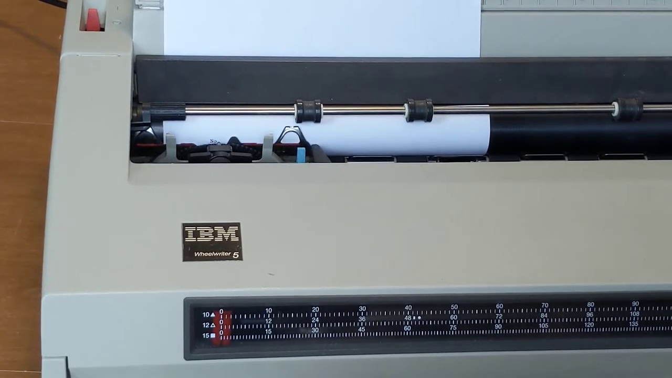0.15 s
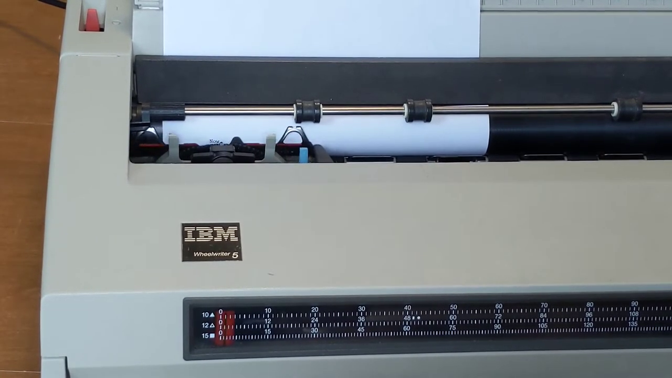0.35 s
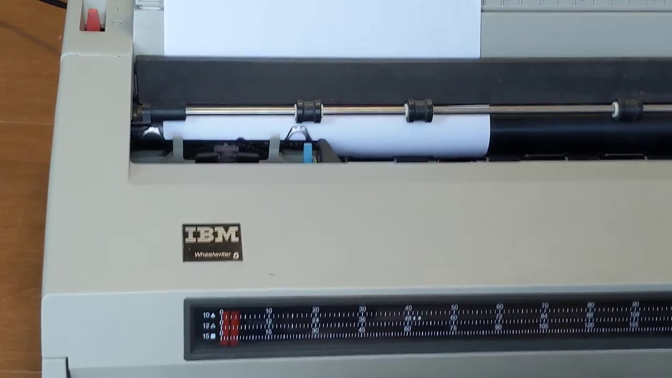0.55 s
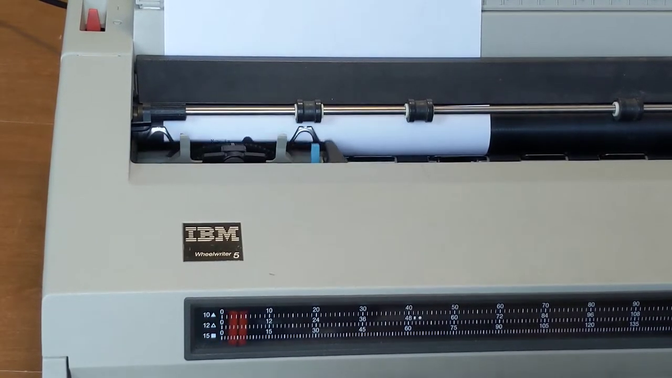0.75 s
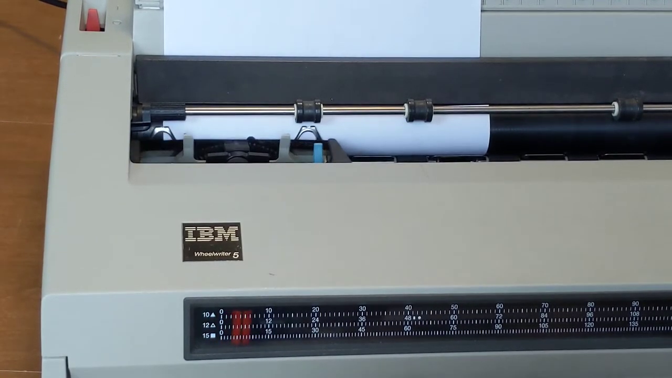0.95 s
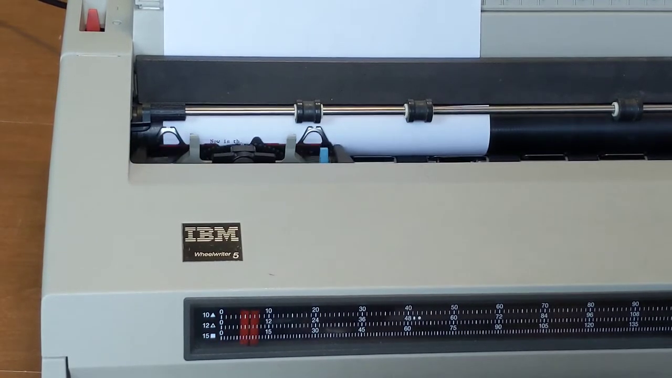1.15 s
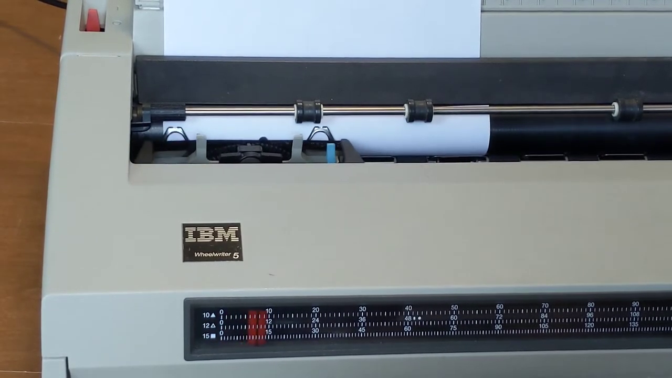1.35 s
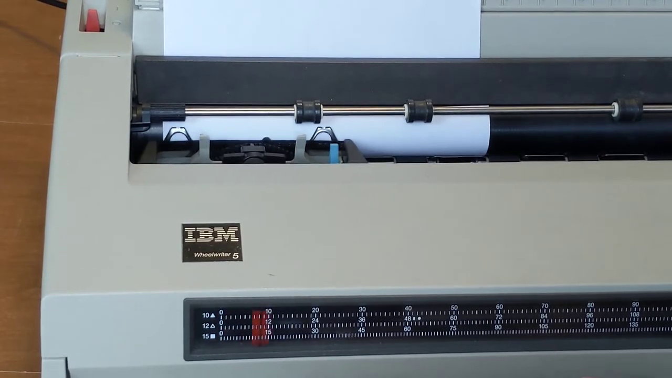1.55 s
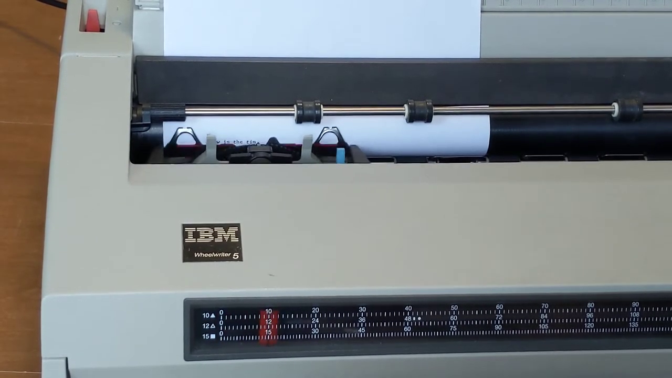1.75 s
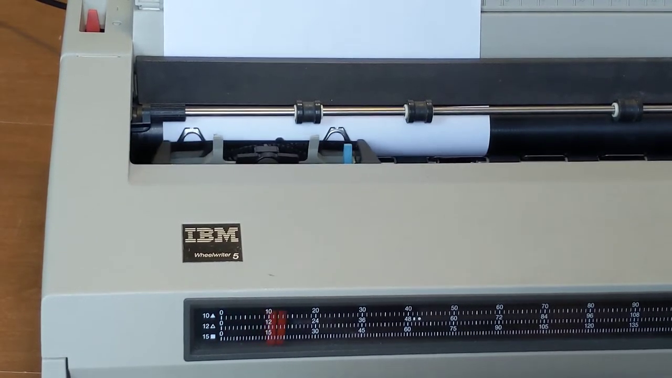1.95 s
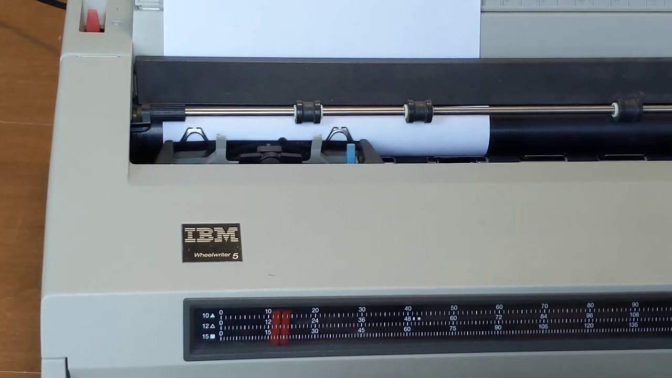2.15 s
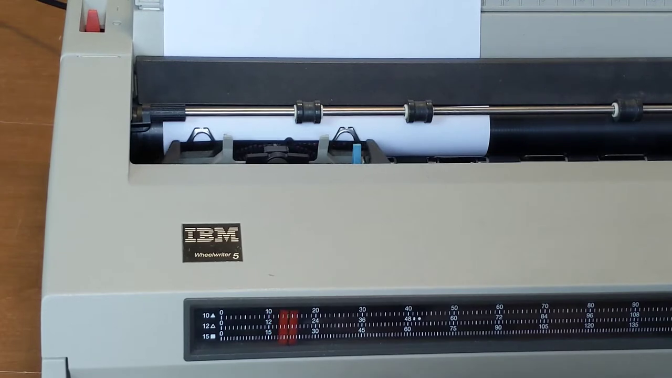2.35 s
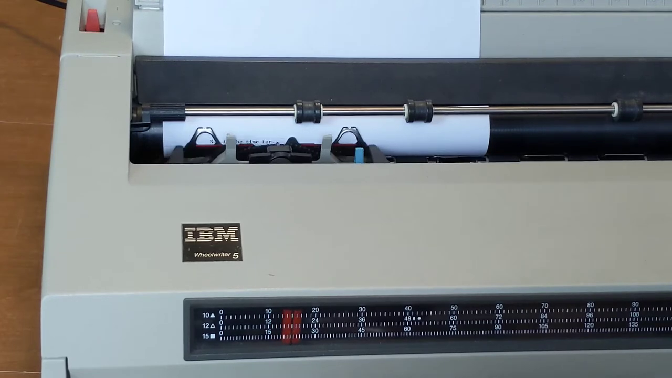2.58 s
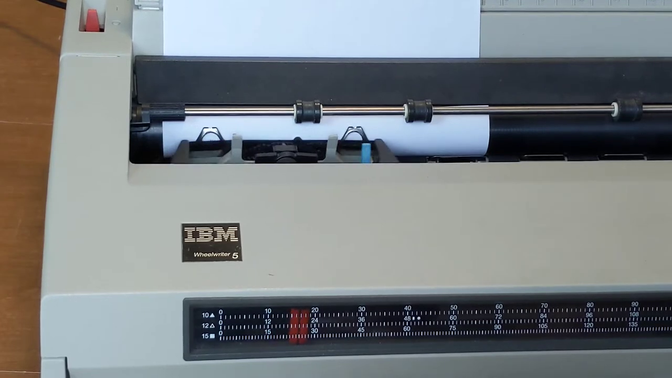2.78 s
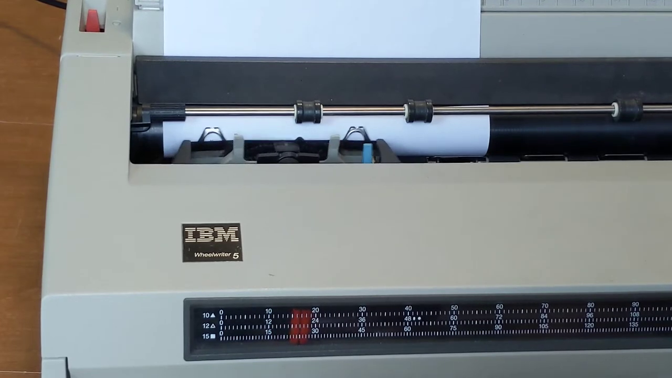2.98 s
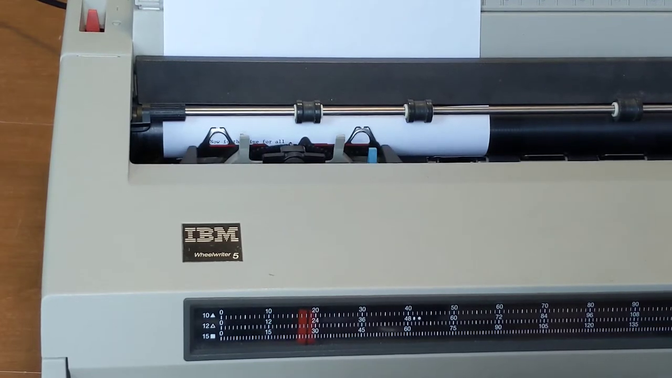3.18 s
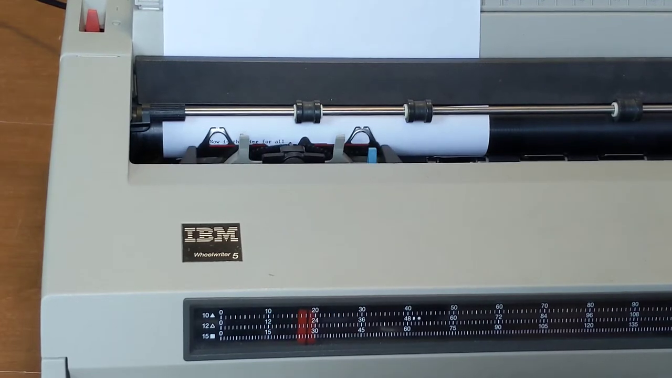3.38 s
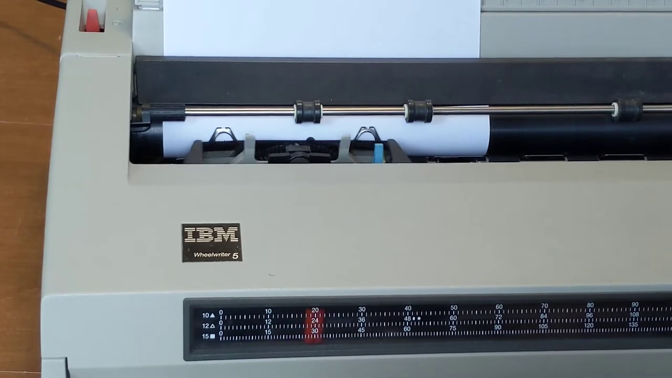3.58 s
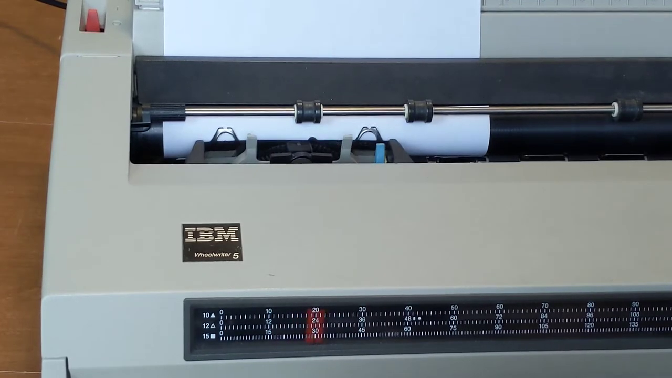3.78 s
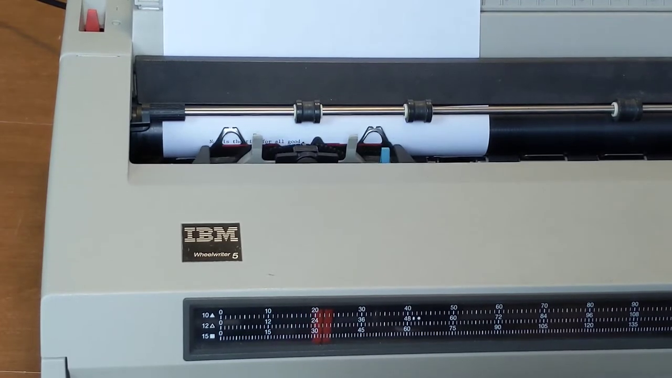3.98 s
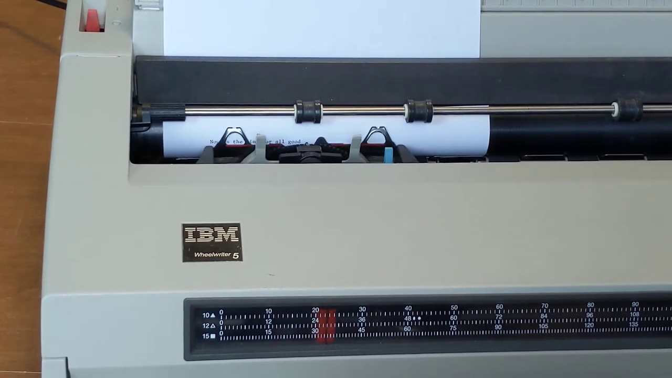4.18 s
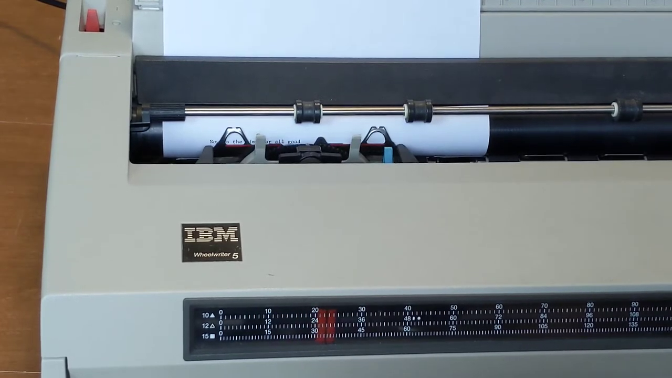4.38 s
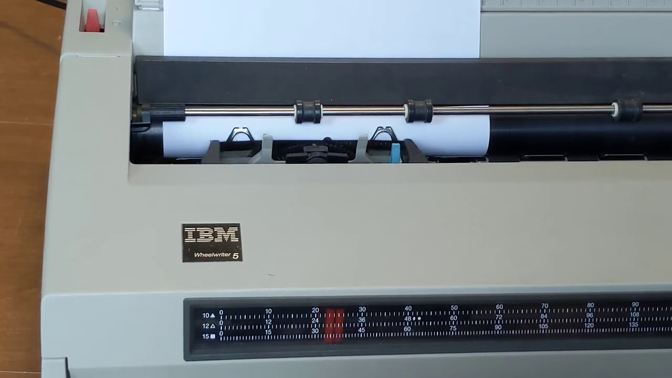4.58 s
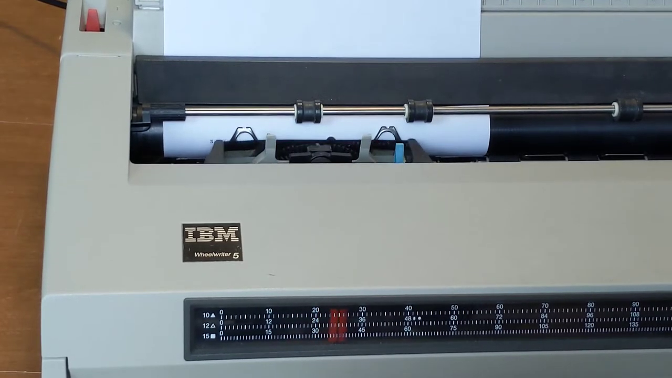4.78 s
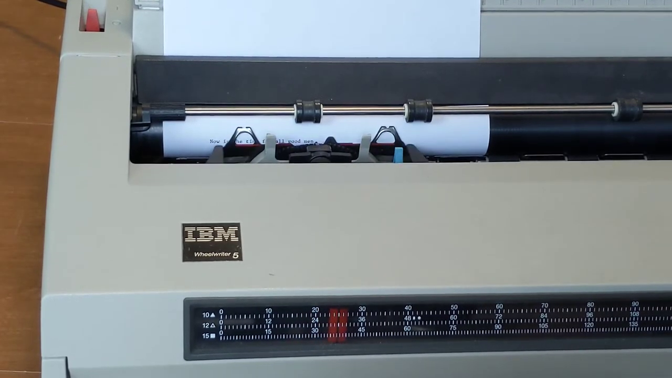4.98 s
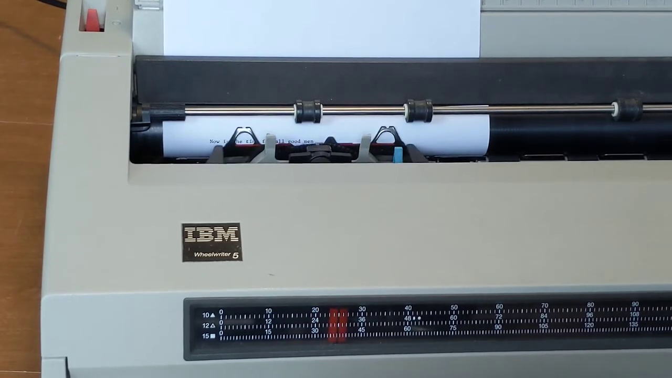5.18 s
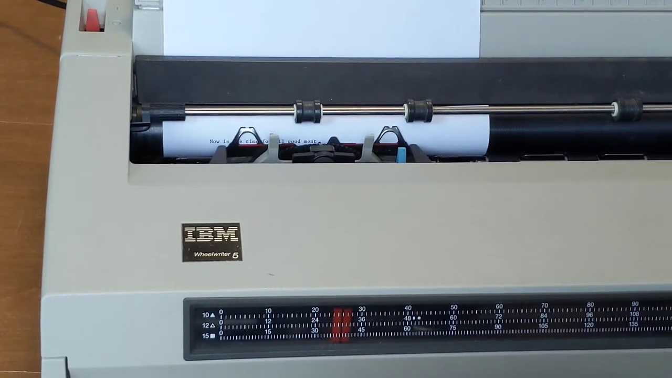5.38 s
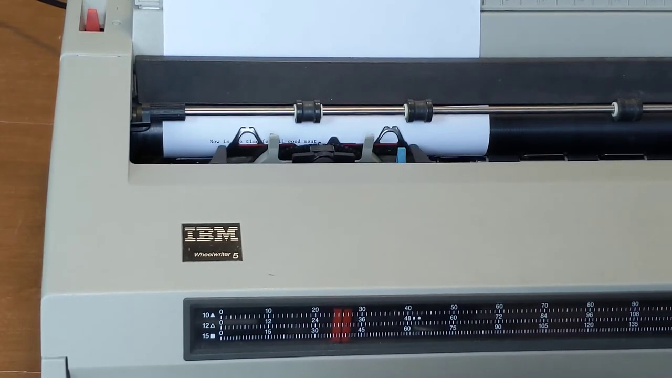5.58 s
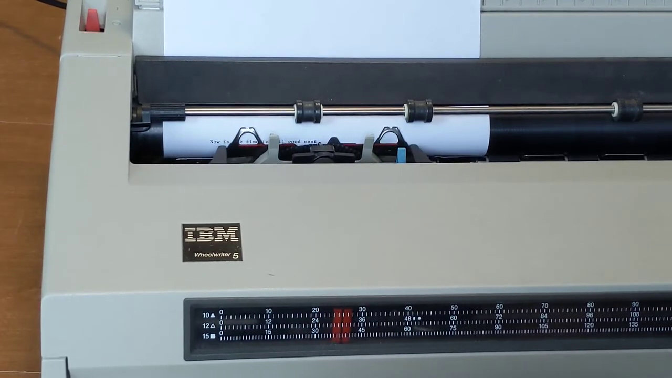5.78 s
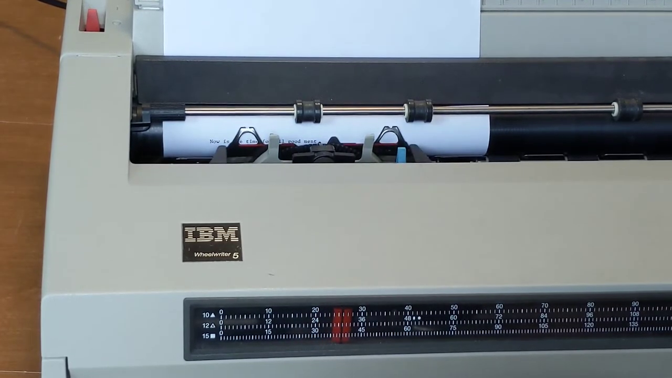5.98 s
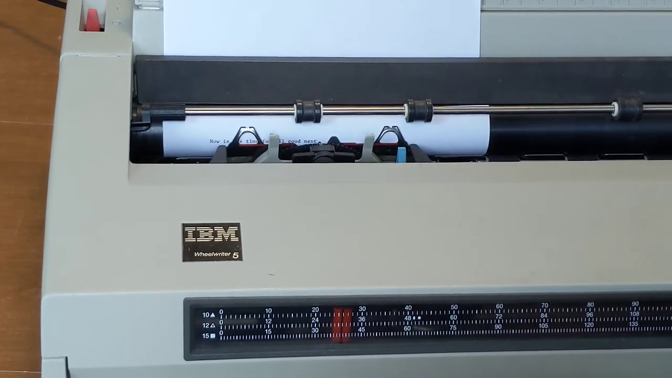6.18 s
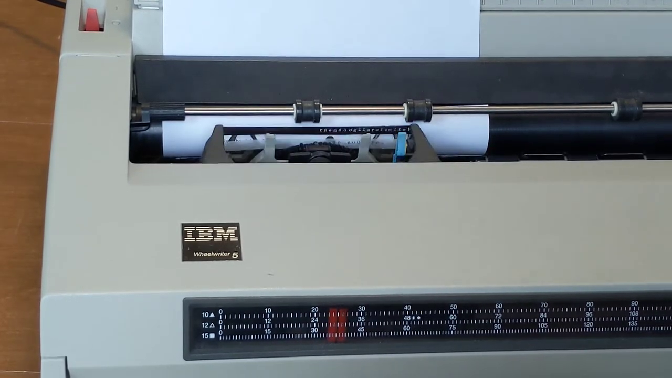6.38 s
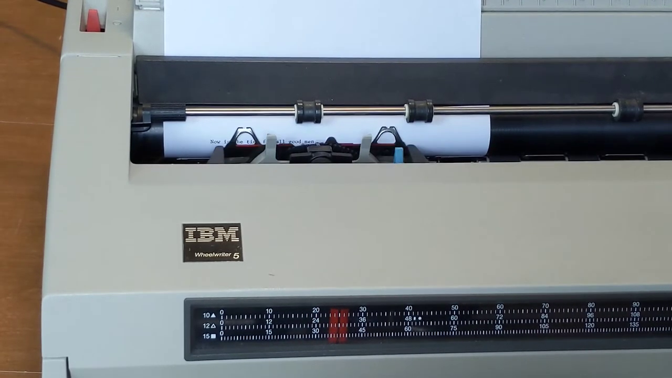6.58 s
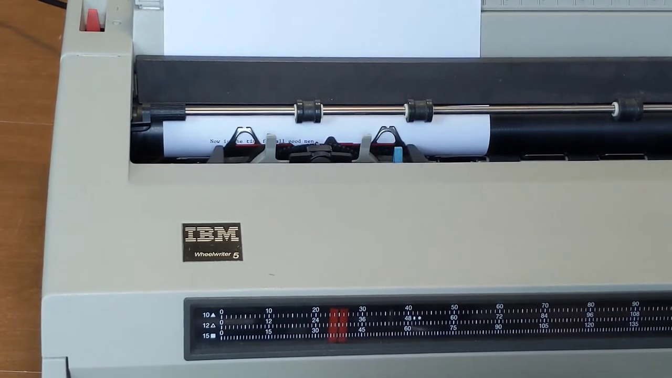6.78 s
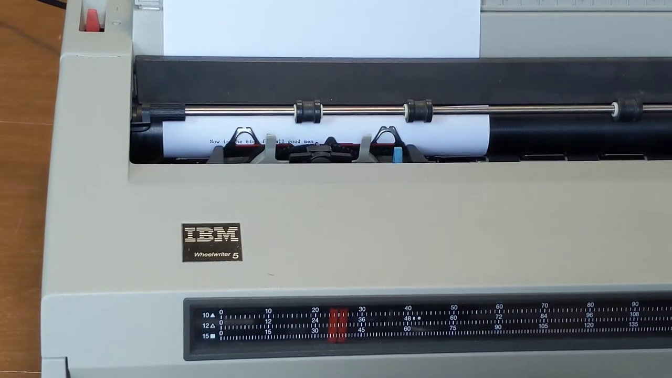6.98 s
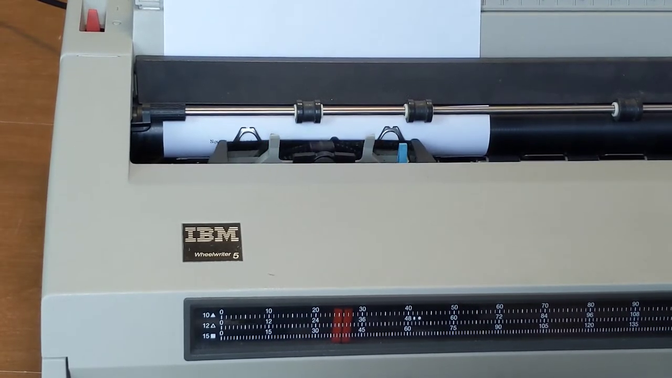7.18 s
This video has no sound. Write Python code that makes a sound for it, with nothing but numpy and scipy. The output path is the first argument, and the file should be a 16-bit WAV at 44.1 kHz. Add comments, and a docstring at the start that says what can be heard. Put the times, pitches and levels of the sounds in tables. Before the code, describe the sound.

An electronic typewriter is heard from just above its cover, on a desk in a quiet room with faint hiss and hum. It opens with a short motor whirr and key knocks, and the first letter strikes at about 0.3 seconds. Until about 5.4 seconds the typing runs unevenly, with sharp slaps coming singly or in quick twos and threes, each trailing a bright rattle and slight metallic ring. Dry plastic key knocks and brittle ribbon clicks fall between them, while the print wheel and carrier whirr in short bursts and the desk thuds softly. A lull follows, with a few light key taps around 6 seconds. At 6.3 seconds the motors whirr again, and two fast strikes land near 6.5 seconds. The carrier shifts with a thud just afterwards, and a few last key knocks and brief whirrs come at around 7.1 seconds.

```python
"""Daisy-wheel typewriter on a desk

Heard from just above the cover in a quiet room. Stepper motors whirr the wheel and carrier
into place, and the desk thuds along. Fingers knock the keys, exciting their damped modes.
A hammer slaps each letter onto the platen; the impact sets the frame chattering
and the metal of the carrier ringing."""
import sys
import numpy as np
from scipy import signal
from scipy.fft import rfft, irfft
from scipy.io import wavfile
from scipy.ndimage import uniform_filter1d

SR = 44100
rng = np.random.default_rng(int(sys.argv[2]) if len(sys.argv) > 2 else 0)


def generate_wav(sig):
    """Save sig (samples, or channels by samples) to the path in sys.argv[1] as 16-bit PCM at SR."""
    pcm = np.round(np.clip(np.atleast_2d(sig).T, -1, 1) * 32767).astype(np.int16)
    wavfile.write(sys.argv[1], SR, pcm)


N = 319284


def amp(db):
    return 10 ** (np.asarray(db) / 20)


def unit_rms(x):
    return x / np.sqrt(np.mean(x ** 2) + 1e-20)


def curve_at(points, hz):
    """Interpolation on a logarithmic frequency axis."""
    f, value = np.transpose(points)
    return np.interp(np.log(hz + 1), np.log(f + 1), value)


def add(mix, onset, sound):
    """Superposition of a sound on the mix at its onset in seconds."""
    part = mix[:, round(onset * SR):][:, :sound.shape[1]]
    part += sound[:, :part.shape[1]]


def excite(response, force):
    """A linear system convolves its input with its impulse response."""
    return signal.oaconvolve(force, response)[:, :N]


def butterworth(x, order, hz, kind):
    return signal.sosfilt(signal.butter(order, hz, kind, fs=SR, output="sos"), x)


def colour(spectrum):
    """Minimum-phase impulse response of unit energy with the given spectral shape."""
    hz = abs(np.fft.fftfreq(2 ** 12, 1 / SR))
    log_gain = np.log(amp(np.maximum(curve_at(spectrum, hz), -100)))
    phase = -signal.hilbert(log_gain).imag
    taps = np.fft.ifft(np.exp(log_gain + 1j * phase)).real[:2048]
    return taps[None] / np.linalg.norm(taps)


def ring(modes, seconds):
    """Free vibration: a sum of damped modes (f/Hz, level/dB, T60/s)."""
    t = np.arange(round(seconds * SR)) / SR
    return sum(amp(db - 60 * t / t60) * np.sin(2 * np.pi * hz * t) for hz, db, t60 in modes)[None]


def chatter(seconds, t60, rise, spread_db):
    """Loose parts rattle after a shock: two draws of uneven noise in exponential decay."""
    t = np.arange(round(seconds * SR)) / SR
    noise = rng.standard_normal((2, len(t)))
    flicker = unit_rms(uniform_filter1d(rng.standard_normal(len(t)), 40))
    clicks = unit_rms(noise * amp(spread_db * flicker))
    return clicks * (1 - np.exp(-t / rise)) * amp(-60 * t / t60)


# Spectral shapes of the steady noise: f/Hz, level/dB
RUMBLE_SPECTRUM = [(15, -15.5), (40, 0.5), (90, -7.5), (200, -15), (260, -10.5), (500, -12), (900, -16.5),
                   (1500, -24)]
HISS_SPECTRUM = [(650, -40.5), (1100, -7.5), (1570, -16.5), (2550, -14.5), (3150, -5), (3410, 0.5),
                 (3530, -4), (4360, 0), (4880, -12), (5580, 1), (6680, -12), (7600, -5.5), (8740, -15.5),
                 (9770, -4), (12100, -18.5), (16000, -35.5)]
# Partials of the power supply: f/Hz, level/dB
HUM_PARTIALS = [(120, -66.5), (240, -69.5), (300, -76), (360, -85), (840, -72.5), (3305, -73)]


def background():
    """Stationary rumble and hiss, with a supply hum under slow amplitude modulation."""
    hz, t = np.fft.rfftfreq(N, 1 / SR), np.arange(N) / SR
    rumble, hiss = (unit_rms(irfft(rfft(rng.standard_normal((2, N))) * amp(curve_at(shape, hz)), N))
                    for shape in (RUMBLE_SPECTRUM, HISS_SPECTRUM))
    noise = rng.standard_normal((len(HUM_PARTIALS), N))
    wavers = unit_rms(uniform_filter1d(uniform_filter1d(noise, 3000), 3000))
    hum = sum(amp(db + 3.03 * waver) * np.sqrt(2) * np.sin(2 * np.pi * (f * t + rng.random()))
              for (f, db), waver in zip(HUM_PARTIALS, wavers))
    return amp(-58) * rumble + amp(-58.5) * hiss + hum


def run_envelope(runs, rise, t60):
    """Linear rise, hold and exponential decay; the loudest run (t/s, duration/s, level/dB) prevails."""
    t = np.arange(0, N, 32) / SR
    onset, length, db = np.transpose(runs)[..., None]
    attack = np.clip((t - onset) / rise, 0, 1)
    gains = attack * amp(db - 60 * np.maximum(t - onset - length, 0) / t60)
    return np.interp(np.arange(N) / SR, t, gains.max(0))


# The wheel spins to a letter, stopping at the next blow: t/s, whirr level/dB
WHEEL_SPINS = [(0.24, -45.5), (0.585, -43), (0.97, -41.5), (1.2, -40), (1.47, -42), (1.82, -40.5),
               (2.085, -40.5), (2.69, -45.5), (2.96, -40), (3.5, -44), (3.76, -44), (4.46, -43.5),
               (4.72, -45), (5.275, -43), (6.4, -37)]
# The carrier moves without printing: t/s, duration/s, whirr level/dB, drive level/dB, thud level/dB
CARRIER_MOVES = [(0.0, 0.0422, -37.5, 0.5, -9), (0.465, 0.0626, -48, 4.5, -3.5),
                 (0.848, 0.104, -42, 5.5, -8), (1.4, .06, -44, -3, -3.5), (2.558, 0.0727, -47.5, 3.5, -8.5),
                 (3.175, 0.1166, -43, 2.5, -9.5), (4.205, 0.077, -51.5, 3, -3.5),
                 (4.344, 0.057, -56.5, -5, -17), (6.317, 0.166, -44, 4.5, -3),
                 (6.6, 0.107, -40.5, -5, -0.5), (7.078, 0.0543, -53.5, 5, -1.5),
                 (7.182, 0.057, -48, -2.5, -12.5)]
# Spectral shapes of the motor whirr and the carrier groan: f/Hz, level/dB
WHIRR_SPECTRUM = [(88, -35), (150, -26.5), (649, -8.5), (1040, -4), (1170, -14.5), (1530, -8),
                  (1900, -14.5), (4000, -7), (4860, -15.5), (5910, -3.5), (6700, -18.5), (7600, -7.5),
                  (8500, -22), (9500, -8), (10700, -21), (11900, -14.5), (12700, -21.5), (14800, -26),
                  (16000, -10.5)]
GROAN_SPECTRUM = [(100, -17), (200, -6.5), (290, 1.5), (380, -4.5), (500, 3), (650, 1.5), (1200, -20.5)]
# Desk resonances: thud (f/Hz, T60/s), then shake (f/Hz, half-bandwidth/Hz)
DESK_MODES = [(112.88, 0.106), (44.8, 22)]
STEP_WAIT_S, STEP_S, STEP_WHIRR_DB = 0.0195, 0.1047, -40  # carrier and ribbon advance after each blow


def motors():
    """Forced vibration: the rasp of gears and ribbon drives a whirr, a groan and the shaking desk."""
    blows = np.transpose(HAMMER_BLOWS)[0]
    spins = [(t, blows[blows > t][0] - t, db) for t, db in WHEEL_SPINS]
    steps = [(t + STEP_WAIT_S, STEP_S, STEP_WHIRR_DB) for t in blows]
    whirr_runs = spins + steps + [move[:3] for move in CARRIER_MOVES]
    drive_runs = [(t, length, 0) for t, length, _ in steps]
    drive_runs += [(t, length, db) for t, length, _, db, _ in CARRIER_MOVES]
    shake_runs = [(t, length, min(db, 0)) for t, length, db in drive_runs]
    shake_runs += [(t, length, -4) for t, length, _ in spins]
    whirr = run_envelope(whirr_runs, rise=0.002, t60=0.333)
    groan = amp(-50.5) * run_envelope(drive_runs, rise=0.0071, t60=0.374)
    shake = amp(-50) * run_envelope(shake_runs, rise=0.0333, t60=0.52)
    rasp = rng.standard_normal((2, N))
    rasp *= amp(1.69 * unit_rms(uniform_filter1d(rng.standard_normal(N), 150)))  # roughness
    (thud_hz, thud_t60), (shake_hz, half_width) = DESK_MODES
    desk = ring([(shake_hz, 0, 1.11 / half_width), (thud_hz, -8, thud_t60)], 0.3)
    layers = [(whirr, colour(WHIRR_SPECTRUM)), (groan, colour(GROAN_SPECTRUM)), (shake, desk)]
    return sum(envelope * unit_rms(excite(body, rasp)) for envelope, body in layers)


THUD_DB, THUD_PEAK_S = -41, 0.0355
THUD_FADE_DB_PER_S = -0.94  # thuds weaken as the carrier travels along the line


def desk_thuds():
    """Transient response: each jerk of the carrier makes one desk mode swell and fade."""
    t = np.arange(round(0.25 * SR)) / SR
    swell = (t / THUD_PEAK_S * np.exp(1 - t / THUD_PEAK_S)) ** 4.3
    thud = swell * np.sin(2 * np.pi * DESK_MODES[0][0] * t)
    jerks = [(onset, 0) for onset, _ in HAMMER_BLOWS] + [(onset, db) for onset, *_, db in CARRIER_MOVES]
    out = np.zeros((2, N))
    for onset, db in jerks:  # row 0 only: the part common to both sides
        add(out[:1], onset, amp(THUD_DB + db + THUD_FADE_DB_PER_S * onset) * thud[None])
    return out


# Knocks of keys and latches: t/s, level/dB, f/Hz, relative click level/dB
KEY_KNOCKS = [(0.004, -42, 875, 0), (0.237, -33, 1083, -0.5), (0.295, -30.5, 1098, -3),
              (0.461, -24, 801, -6.5), (0.577, -28.5, 920, -7.5), (0.6, -24.5, 1296, -6),
              (0.686, -32.5, 1334, -0.5), (0.846, -18.5, 1009, -9.5), (0.945, -22.5, 908, -17.5),
              (0.959, -18, 1441, -17.5), (1.031, -28.5, 1300, -14.5), (1.058, -22, 1036, -11.5),
              (1.171, -30, 1330, -2), (1.271, -30, 1056, -1), (1.371, -23, 794, -10.5),
              (1.465, -20, 1310, -12.5), (1.529, -26, 1346, -5), (1.802, -20.5, 1077, -10),
              (1.983, -26.5, 776, -12.5), (2.113, -28.5, 1308, -4), (2.204, -35, 840, -6),
              (2.334, -32, 1064, -1), (2.553, -26.5, 764, -5), (2.679, -35, 1200, -6),
              (2.686, -26.5, 1334, -9), (2.8, -25, 1455, -15.5), (2.955, -27.5, 1128, -5.5),
              (3.169, -28.5, 760, -5.5), (3.23, -26.5, 1024, -19.5), (3.447, -38.5, 1035, -10.5),
              (3.496, -31.5, 1118, -4), (3.772, -28, 1305, -6), (3.837, -31, 770, -5.5),
              (4.202, -26, 794.5, -6.5), (4.351, -30.5, 826, -8), (4.459, -41, 1064, 0),
              (4.687, -24, 1069, -8), (4.759, -29, 1038, -5), (5.873, -35, 1610, -7),
              (6.006, -38.5, 1244, -17), (6.078, -41, 1342, -16.5), (6.293, -34.5, 1365, 3),
              (6.406, -30, 1495, -19), (6.663, -39, 1090, 0), (6.945, -54, 1090, -3.5),
              (7.046, -48, 1200, -4), (7.075, -27, 1583, -4), (7.196, -28.5, 1112, -8)]
# Modes of a key: ratio to the knock's frequency, level/dB, T60/s
KEY_MODES = [(1.0027, 4, 0.016), (1.221, 0.5, 0.0102), (0.779, -10, 0.0315), (1.6, -11, 0.0188),
             (2.488, -8.5, 0.0094)]
# Spectral shape of a click: f/Hz, level/dB
CLICK_SPECTRUM = [(180, -31.5), (300, -18.5), (915, -2.5), (1340, 1.5), (1870, -4), (3400, 1.5),
                  (4910, -10.5), (5610, -5.5), (9550, -6), (16000, -15)]
LIFT_LEAD_S, LIFT_DB = 0.034, -36.5  # the ribbon clicks up before each blow


def keys_and_ribbon():
    """Impact on heavily damped plastic gives a dry knock; keys and ribbon add brittle clicks."""
    knocks, clicks = np.zeros((2, 2, N))
    for t, db, hz, click_db in KEY_KNOCKS:
        shock = chatter(0.1, t60=0.0148, rise=0.000362, spread_db=4)
        shock += amp(-13.5) * chatter(0.1, t60=0.0796, rise=0.0023, spread_db=2.5)
        modes = [(hz * ratio, level, t60) for ratio, level, t60 in KEY_MODES]
        body = signal.fftconvolve(shock, ring(modes, 0.06), axes=1)
        add(knocks, t, amp(db + 1) * body / abs(body).max(1, keepdims=True))
        add(clicks, t, amp(db + click_db) * chatter(0.064, t60=0.256, rise=0.0008, spread_db=3))
    for t, _ in HAMMER_BLOWS:
        add(clicks, t - LIFT_LEAD_S, amp(LIFT_DB) * chatter(0.21, t60=0.2, rise=0.00065, spread_db=2.5))
    return butterworth(knocks, 2, 600, "high") + amp(-2.5) * excite(colour(CLICK_SPECTRUM), clicks)


# Blows of the hammer on the platen: t/s, level/dB
HAMMER_BLOWS = [(0.3442, -22), (0.694, -23.5), (0.7764, -22.5), (1.052, -24), (1.1283, -20.5),
                (1.339, -23.5), (1.6141, -23), (1.6764, -23), (1.7376, -21), (1.9524, -23.5),
                (2.2284, -22.5), (2.3038, -23), (2.393, -23.5), (2.778, -23), (2.8685, -22.5),
                (3.0821, -23), (3.586, -20), (3.6707, -23), (3.8837, -23), (3.9623, -20), (4.5651, -21),
                (4.6284, -23.5), (4.841, -23.5), (5.3652, -23.5), (6.4613, -23), (6.511, -24)]
# Spectral shape of the rattle after each blow, as heard at the microphones,
# whose housing resonances give the treble peaks: f/Hz, level/dB
RATTLE_SPECTRUM = [(88, -22.5), (150, -21), (578, -12.5), (1530, -12.5), (1980, -14), (3700, -6),
                   (4080, -0.5), (4950, -10.5), (5790, -1.5), (6770, -12.5), (7600, -7.5), (8500, -11),
                   (9450, -6.5), (10600, -18), (11400, -14), (11900, -9), (12500, -21.5), (13800, -16.5),
                   (16000, -39.5)]
# Modes of the carrier's metal: f/Hz
CARRIER_MODE_HZ = [1039, 1600, 2382, 2461, 3505, 3851, 4042, 4117, 4168, 4235, 4300, 5722, 5838, 5963, 6302]
# Strength and decay of those modes: level/dB, T60/s
CARRIER_MODE_DECAYS = [(-12.5, 0.172), (-5, 0.07), (-0.5, 0.098), (1, 0.0463), (-0.5, 0.0333), (-28, 0.082),
                       (-28.5, 0.14), (-8, 0.21), (5, 0.138), (-1.5, 0.0433), (-24.5, 0.094), (-17, 0.063),
                       (-4, 0.074), (4.5, 0.13), (-4.5, 0.12)]
CROSSOVER_HZ = 7420  # the finer rattle above this builds up a moment later


def hammer():
    """Impact excitation: each blow slaps the platen, rattles the frame and rings the carrier's modes."""
    crack, rattle, fine, impulse = np.zeros((4, 2, N))
    for t, db in HAMMER_BLOWS:
        # the type lands and bounces
        add(crack, t, amp(db) * chatter(0.013, t60=0.0344, rise=0.000057, spread_db=1.5))
        add(rattle, t, amp(db) * chatter(0.35, t60=0.2386, rise=0.00386, spread_db=1.5))
        add(impulse, t, amp(db + 13.5) * np.ones((2, 1)))
        add(fine, t, amp(db + 2.5) * chatter(0.55, t60=0.1542, rise=0.00675, spread_db=-0.5))
    slap = amp(-14.5) * butterworth(crack, 3, [900, 6500], "band")
    full_rattle = butterworth(rattle, 4, CROSSOVER_HZ, "low") + butterworth(fine, 4, CROSSOVER_HZ, "high")
    heard_rattle = excite(colour(RATTLE_SPECTRUM), full_rattle)
    modes = [(hz, db, t60) for hz, (db, t60) in zip(CARRIER_MODE_HZ, CARRIER_MODE_DECAYS)]
    carrier_force = impulse + amp(-4.5) * crack + amp(-21.5) * rattle
    return slap + heard_rattle + amp(-27.5) * excite(ring(modes, 0.4), carrier_force)


def room(x, low_t60=0.5, high_t60=0.1596):
    """Diffuse reverberation: the treble decays faster, so the tail dulls as it dies."""
    t = np.arange(SR // 2) / SR
    noise = rng.standard_normal((2, len(t)))
    low = signal.lfilter([0.3], [1, -0.7], noise)
    tail = low * amp(-60 * t / low_t60) + (noise - low) * amp(-60 * t / high_t60)
    tail *= t > 0.006  # delay of the first reflection
    return signal.oaconvolve(x, tail / np.linalg.norm(tail[0]), axes=1)[:, :N]


# Likeness of left and right: f/Hz, coherence
COHERENCE = [(60, 1), (125, 0.975), (250, 0.923), (500, 0.303), (1000, 0.857), (2000, 0.214), (4000, 0.358),
             (6000, 0.137), (8500, 0.985), (11000, 1), (12000, 0.81), (14500, 1)]
# Lead of left over right: f/Hz, phase/rad
PHASE_LEAD = [(150, 0), (520, 0.49), (950, 0.44), (3270, -0.2), (4480, -2.083), (5860, 0.52)]
# Excess of left over right: f/Hz, level/dB
LEVEL_DIFFERENCE = [(60, 1), (150, -0.91), (380, -0.5), (950, 2.5), (2380, .5), (4500, 2), (9000, 2)]


def microphone_pair(sound):
    """Partial coherence: two close ports hear row 0 in common and row 1 with opposite signs."""
    mid, side = rfft(sound)
    hz = np.fft.rfftfreq(N, 1 / SR)
    coherence = np.clip(curve_at(COHERENCE, hz), 0, 1)
    mid *= np.sqrt((1 + coherence) / 2)
    side *= np.sqrt((1 - coherence) / 2)
    # each port takes half the phase and level difference
    bias = np.exp(0.5j * curve_at(PHASE_LEAD, hz)) * amp(curve_at(LEVEL_DIFFERENCE, hz) / 2)
    return irfft(np.array([(mid + side) * bias, (mid - side) / bias]), N)


def scene():
    """Superposition of machine, reverberation, desk and background at the microphones."""
    machine = hammer() + keys_and_ribbon() + motors()
    return microphone_pair(machine + amp(-9) * room(machine) + desk_thuds() + background())


def record(dry, cutoff_hz=15780):
    """Band limiting by a linear-phase low-pass filter."""
    taps = signal.firwin(1023, cutoff_hz, window=("kaiser", 9), fs=SR)
    return signal.oaconvolve(dry, taps[None], "same")


dry = scene()
out = record(dry)
generate_wav(out)
```